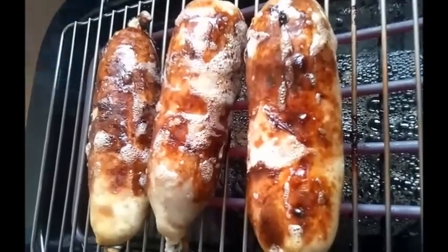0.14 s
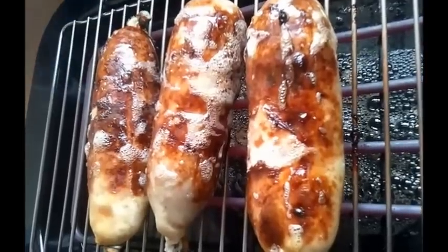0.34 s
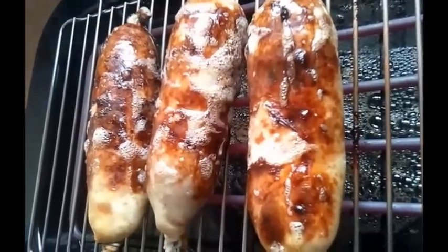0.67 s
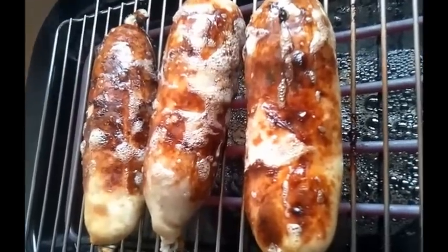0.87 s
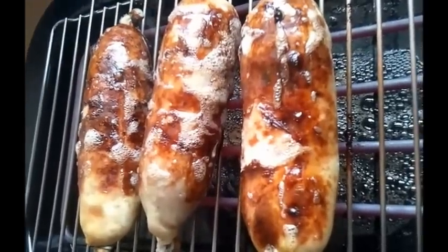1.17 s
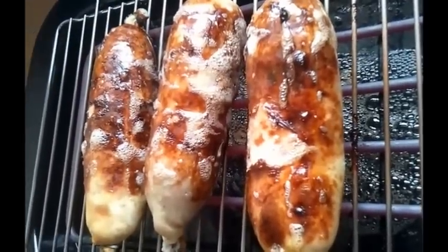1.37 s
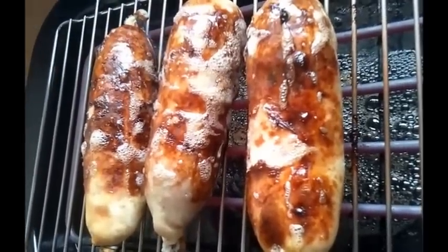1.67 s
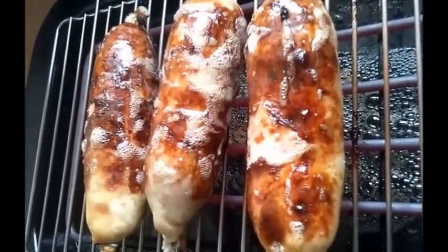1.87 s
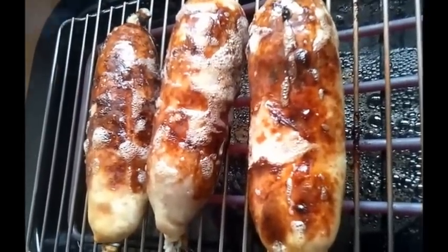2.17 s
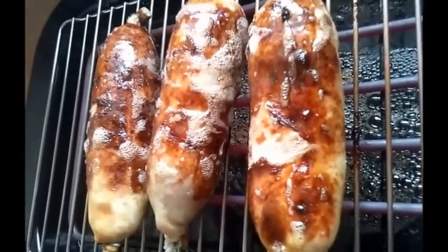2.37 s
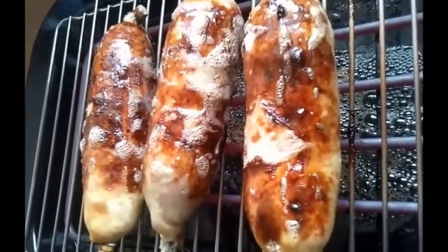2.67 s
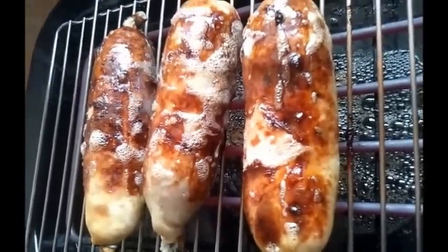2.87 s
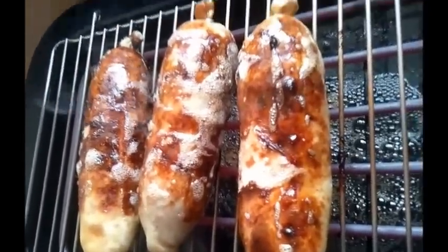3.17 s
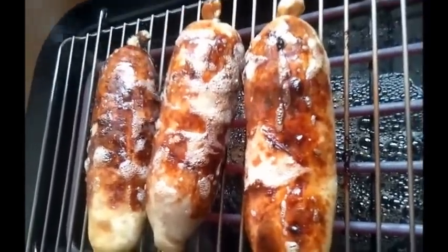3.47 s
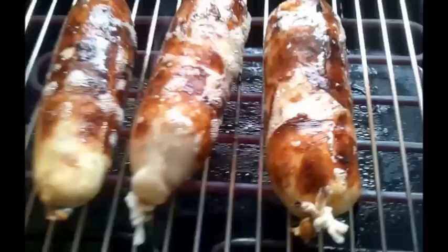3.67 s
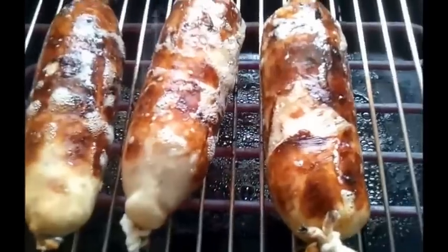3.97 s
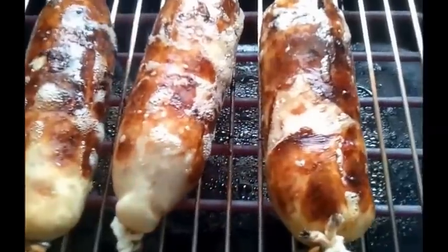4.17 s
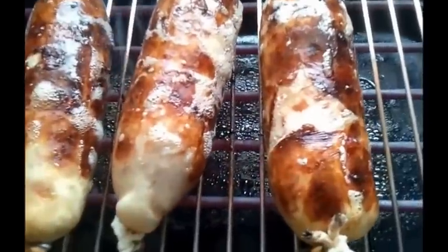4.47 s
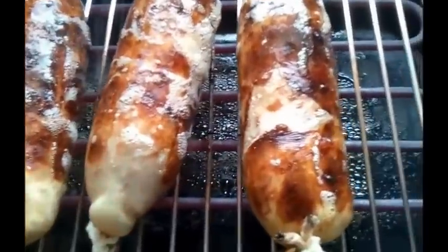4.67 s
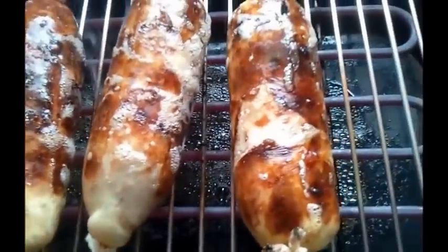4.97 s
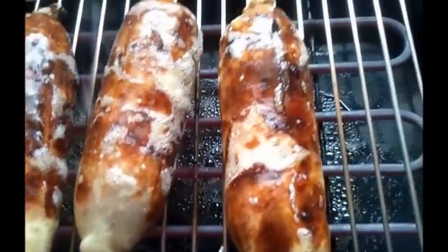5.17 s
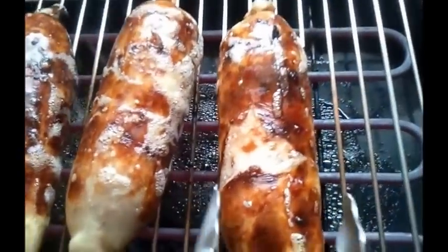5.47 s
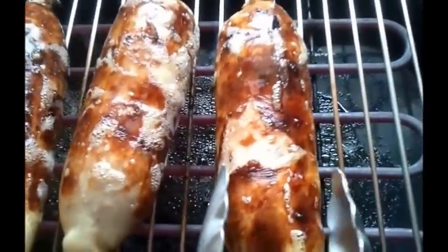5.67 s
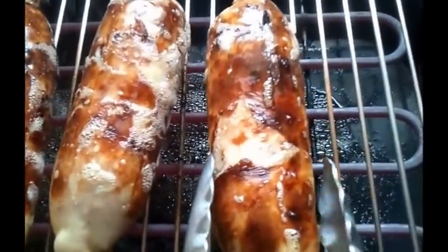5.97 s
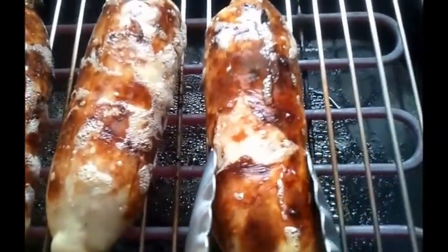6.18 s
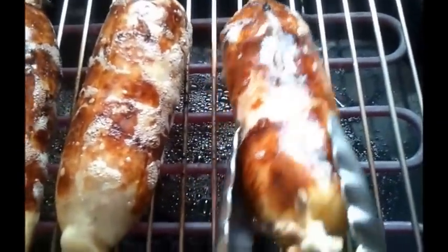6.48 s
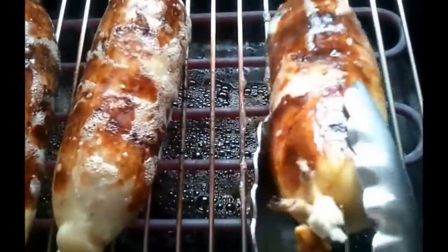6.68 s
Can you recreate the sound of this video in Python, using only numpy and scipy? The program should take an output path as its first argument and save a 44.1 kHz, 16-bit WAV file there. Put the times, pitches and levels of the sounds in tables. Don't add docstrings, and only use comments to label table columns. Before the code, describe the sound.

From 0 to about 3.2 seconds, sausages sizzle steadily close to a phone microphone: bright steamy hiss, fine clustered crackle and many irregular fat pops, some sharp, some with a duller body, each with a short splash and faint kitchen decay. The simmer swells slightly around 0.7 to 1.2, then eases. A weak low rumble lies beneath. At 3.25 to 3.3 two soft low touches thump, with a fainter one near 3.7, while the tone shifts as the phone turns, thinner in the middle. Sound drops to silence at 3.93 and restarts abruptly at 4.05 with a low lurch. A very loud crack hits at 4.11. The boil is now louder and crisper, with faint low drone swells near 4.45 and 4.8. Another hard crack comes at 5.46; after 6 seconds spitting pops crowd together and the hiss climbs strongly to the end, near 6.8.

```python
import sys
import numpy as np
from scipy import signal
from scipy.fft import rfft, irfft
from scipy.io import wavfile
from scipy.ndimage import uniform_filter1d, minimum_filter1d, map_coordinates

SR = 44100
rng = np.random.default_rng(int(sys.argv[2]) if len(sys.argv) > 2 else 0)


def wav_record(signal):
    frames = np.transpose(np.atleast_2d(signal))
    bounded = np.clip(frames, -1, 1)
    quanta = np.round(bounded * 32767).astype(np.int16)
    wavfile.write(sys.argv[1], SR, quanta)


def volts(x):
    e = np.asarray(x, float) / 20
    return 10 ** e


N = 301644

# frequency in Hz, density in dB per Hz.
RUMBLE = [(12, -25), (20, -2.5), (118, -2), (290, -5.5), (325, -10), (600, -10), (780, -10.5), (1320, -120)]
# frequency in Hz, width in Hz, level in dB.
ROOM_MODES = [
    (44, 4.4, 2),
    (275.5, 6.5, -4),
    (311, 17, -2),
]
# time in seconds, level in dB.
HOUSE_LEVEL = [
    [(0, -52), (3.9, -50.5)],
    [(4.9, -45), (5.3, -46)],
]
# peak time in seconds, level in dB.
SWELLS = [
    (4.45, -41),
    (4.79, -41),
    (5.11, -51),
    (5.89, -49.5),
    (6.23, -49),
    (6.56, -52),
]
# start in seconds, peak in dB, frequency in Hz.
BUMPS = [
    (3.249, -36, 59),
    (3.3, -41.5, 56.4),
    (3.726, -45, 57),
]
# time in seconds, share of the second position from 0 to 1.
TURN = [
    (3.25, 0),
    (3.6, .7),
    (4.05, 1),
]
# frequency in Hz, density in dB per Hz.
SIDE_ON = [(300, -25.5), (410, -19.5), (950, -11.5), (1670, -6.5), (2350, -18), (2900, -11), (3350, -7),
           (4250, -4), (5200, -9), (6100, 1), (8000, -3), (10200, 12), (11800, 2.5), (14400, 1)]
# frequency in Hz, density in dB per Hz.
HEAD_ON = [(320, -26), (1400, -15), (1950, -17), (2700, -25), (3250, -22), (3750, -15.5), (4250, -13.5),
           (5500, -14), (6500, -19.5), (8700, -9.5), (9800, 1), (11200, -0.5), (12300, -9), (14500, -17)]
# lower edge in Hz, upper edge in Hz.
BANDS = [(120, 2650), (2650, 7900), (7900, 17000)]
# start in seconds, peak in dB, thud in dB, body in dB.
EARLY_POPS = [(0.0787, -12, -24.5, -15.5), (0.163, -18, -25, -25), (0.2062, -25, -21, -8.5),
              (0.2448, -6.5, -28, -14), (0.3913, -19.5, -22, -17), (0.4254, -11, -28, -16),
              (0.4612, -17.5, -25, -16), (0.4978, -14.5, -25, -12.5), (0.5474, -15.5, -33, -20.5),
              (0.5837, -8.5, -30, -17.5), (0.6846, -11.5, -23, -21), (0.8492, -8.5, -30, -16.5),
              (0.8915, -17.5, -29, -10), (0.9118, -6, -28, -22), (1.0275, -24, -25.5, -13),
              (1.0867, -19, -16, -8), (1.1253, -11.5, -20, -8), (1.1447, -5.5, -12, -12.5),
              (1.1952, -6, -23, -17), (1.2451, -14.5, -20, -14), (1.2757, -11, -28, -17),
              (1.3282, -6.5, -26.5, -11.5), (1.4282, -7, -33, -21), (1.49, -5.5, -41, -22.5),
              (1.572, -10.5, -34, -17), (1.594, -9.5, -35, -23.5), (1.677, -24.5, -21, -12),
              (1.6923, -11.5, -41, -15.5), (1.8604, -24, -32, -17), (1.9114, -12.5, -25, -11)]
# start in seconds, peak in dB, thud in dB, body in dB.
MORE_POPS = [(1.9796, -9, -20, -10), (2.02, -14, -13, -11), (2.0448, -13, -24, -20), (2.111, -13, -34, -19),
             (2.2412, -15, -22, -13), (2.308, -25, -16, -7), (2.3354, -5.5, -24, -12),
             (2.4244, -15, -18, -8), (2.5657, -21, -30, -9), (2.6543, -14, -19, -11),
             (2.765, -14, -25, -15.5), (2.8893, -7.5, -25.5, -18.5), (2.9752, -19.5, -22, -14),
             (3.0113, -12, -28, -13.5), (3.0329, -13.5, -28, -11.5), (3.0865, -20, -39, -7),
             (3.216, -14.5, -15, -9), (3.2443, -9, -20.5, -16.5), (3.3023, -15.5, -21, -12.5),
             (3.3457, -17, -30, -11.5), (3.362, -13, -29.5, -21), (3.4, -15.5, -24, -17),
             (3.433, -15.5, -25.5, -18), (3.4559, -6.5, -35.5, -23.5), (3.5447, -11.5, -25.5, -15),
             (3.5767, -11.5, -28.5, -16.5), (3.6727, -17.5, -22, -18), (3.731, -12.5, -34, -16.5),
             (3.8124, -19.5, -33, -16.5), (3.845, -9.5, -35.5, -20.5)]
# start in seconds, peak in dB, thud in dB, body in dB.
LATE_POPS = [(4.1107, 6, -34, -20), (4.1786, -11, -17.5, -12), (4.6459, -9.5, -38, -26),
             (4.7164, -13, -23, -12), (4.8596, -11.5, -29.5, -19.5), (4.877, -11, -29, -19),
             (4.972, -11.5, -32, -23), (5.121, -5, -32, -25), (5.1768, -16.5, -24, -14),
             (5.3083, -8.5, -30, -30), (5.3428, -15, -23, -23), (5.3804, -8.5, -27, -21),
             (5.4303, -7.5, -29, -23), (5.4571, 3.5, -34, -19.5), (5.981, -10.5, -22, -18),
             (6.0853, -13.5, -29, -23.5), (6.1879, -13, -28, -21), (6.2256, -5, -27, -24),
             (6.2953, -4, -22.5, -33), (6.3153, -5.5, -23.5, -19), (6.3325, -6.5, -25.5, -22.5),
             (6.3901, -4, -33, -25), (6.4794, -7.5, -26, -18), (6.5081, -9.5, -40, -25),
             (6.5337, -10.5, -33, -18), (6.5626, -12, -30, -20.5), (6.5784, -6, -34, -14.5),
             (6.6451, -10.5, -26, -26), (6.7118, -9.5, -34, -24.5), (6.7613, -3.5, -32, -20)]
# start in seconds, peak in dB.
TICKS = [(0.2574, -9), (0.2994, -15), (0.9584, -14), (1.0934, -13), (1.1154, -7), (1.2004, -14),
         (1.2884, -16), (1.4464, -17), (1.5114, -20), (2.4344, -14), (2.4474, -17), (2.6674, -14),
         (2.7334, -13), (2.8504, -20), (2.9104, -13), (3.2514, -15), (3.4374, -12), (3.5534, -11),
         (4.4518, -12), (4.4814, -14), (5.3198, -8), (5.3884, -9), (5.5069, -9), (5.9359, -12),
         (6.2003, -8), (6.3004, -3), (6.3554, -10), (6.4358, -9), (6.4527, -10), (6.7795, -10)]
# before the pause in dB, after it in dB.
SNAPS_DB = (-13.5, -8.5)
# time in seconds, level in dB.
HEAT = [
    [(0, -37.5), (.25, -37.5), (.7, -34), (1.25, -35), (1.55, -38), (2.4, -36.5), (2.85, -36), (3.4, -38),
     (3.8, -36.5)],
    [(4.13, -30.5), (4.3, -30), (4.85, -32), (5.3, -32.5), (5.5, -29), (6.25, -29.5), (6.33, -30),
     (6.7, -26.5), (6.84, -22.5)],
]
# simmer in dB, hiss in dB, fizz in dB.
BAND_LEVELS_DB = [(-11, -5.5, -3.5), (-12, -10, -3.5)]
# stop in seconds, restart in seconds.
PAUSE = (3.929, 4.053)
# frequency in Hz, level in dB under the general level.
FAINTEST = [(250, -30), (350, -8), (3500, -6.5), (4000, -11.5)]


def unit(x):
    return x / np.sqrt(np.mean(x ** 2) + 1e-20)


def curves(rows):
    s, *columns = np.transpose(rows)
    return [np.interp(np.arange(N) / SR, s, column) for column in columns]


def joined(parts):
    return np.where(np.arange(N) / SR < PAUSE[1], curves(parts[0]), curves(parts[1]))


def wobble(rate):
    knots = rng.standard_normal(int(N * rate / SR) + 4)
    return map_coordinates(knots, [np.arange(N) * rate / SR])


def causal(spectrum, size=4096):
    f, db = np.transpose(spectrum)
    log_hz = np.log(np.fft.rfftfreq(size, 1 / SR) + 1)
    gain = volts(np.interp(log_hz, np.log(f), db))
    cepstrum = irfft(np.log(gain + 1e-6))
    cepstrum[1:size // 2] *= 2
    cepstrum[size // 2 + 1:] = 0
    return irfft(np.exp(rfft(cepstrum)))


def patchy(depth_db):
    z = signal.stft(rng.standard_normal(N + 256), nperseg=256)[2]
    field = uniform_filter1d(rng.standard_normal(z.shape), size=5, axis=0)
    field = uniform_filter1d(field, size=8, axis=1)
    noise = signal.istft(z * volts(depth_db * unit(field)), nperseg=256)[1]
    return unit(noise[:N])


def kitchen():
    hz = np.fft.rfftfreq(N, 1 / SR)
    modes = sum(volts(db) * 1j * hz * w / (c * c - hz * hz + 1j * hz * w) for c, w, db in ROOM_MODES)
    boom = unit(irfft(rfft(rng.standard_normal(N)) * modes, N))
    boom = boom * volts(-3.5 + 1.8 * wobble(2.34))
    broad = unit(signal.fftconvolve(patchy(depth_db=2.5), causal(RUMBLE, size=16384))[:N])
    return volts(joined(HOUSE_LEVEL)[0]) * (broad + curves(TURN)[0] * boom)


def drone():
    rest_db, swell_s, mode_hz = -56.5, 0.085, 91
    t = np.arange(N) / SR
    level = volts(rest_db) + sum(volts(db) * np.exp(-((t - s) / swell_s) ** 2) for s, db in SWELLS)
    tone = unit(np.sin(2 * np.pi * mode_hz * t + 1.8 * wobble(11)))
    return level * tone * (t > PAUSE[1])


def bumps():
    out, t = np.zeros(N + SR), np.arange(SR // 10) / SR
    dull = signal.butter(2, (100, 400), "bandpass", fs=SR, output="sos")
    for s, db, hz in BUMPS:
        scuff = unit(signal.sosfilt(dull, rng.standard_normal(len(t))))
        scuff = volts(-10 - 60 * t / .1) * scuff
        thump = volts(-60 * t / 0.11) * np.sin(2 * np.pi * hz * t)
        out[round(s * SR):][:len(t)] += volts(db + 11.0) * (thump + scuff)
    return out[:N]


def bursts(count, tail_db):
    snap_share = 0.36
    t = np.arange(SR // 8) / SR
    late = t - .0021 * volts(rng.normal(0, 1.5, (count, 1)))
    echo = volts(-15.5 - 60 * np.abs(late) / 0.0032) * (late > 0)
    spit = volts(-60 * t / 0.002) + echo
    tail = volts(tail_db + 4 - 60 * t / .03) + volts(tail_db - 60 * t / .2)
    rows = (spit + tail) * rng.standard_normal((count, len(t)))
    rows = rows / np.linalg.norm(rows[:, :SR // 500], axis=1, keepdims=True)
    return rows + snap_share * (t == 0) * np.sign(rows[:, :1])


def pops():
    thud_db, body_db = -27.5, -18
    trains = np.zeros((len(BANDS), N + SR))
    ticks = [(s, db, thud_db, body_db) for s, db in TICKS]
    ring_bands = ((1000, 2000), (4000, 7000), (9300, 11300))  # Hz, where each part's peak is set
    rings = [signal.butter(1, band, "bandpass", fs=SR, output="sos") for band in ring_bands]
    for events in (EARLY_POPS, MORE_POPS, LATE_POPS, ticks):
        for (s, db, *parts_db), burst in zip(events, bursts(count=len(events), tail_db=-22.5)):
            at = round((s + .0007) * SR)
            peaks = np.array([np.abs(signal.sosfilt(ring, burst[:SR // 100])).max() for ring in rings])
            snap_db = SNAPS_DB[int(s > PAUSE[1])]
            gains = volts(db + np.array([*parts_db, snap_db])) / peaks
            trains[:, at:at + len(burst)] += gains[:, None] * burst
    dull = signal.butter(2, 11500, fs=SR, output="sos")
    return volts(np.array([[-1.5], [6], [3]])) * signal.sosfilt(dull, trains[:, :N])


def crackle(rate, spread_db):
    when, size = rng.random((2, N))
    chance = rate * volts(3 * wobble(25)) / SR
    clicks = (when < chance) * volts(-spread_db * np.log(np.maximum(size, .04)))
    kinds = bursts(count=6, tail_db=-27.5)
    kind = rng.integers(len(kinds), size=N)
    return unit(sum(signal.fftconvolve(clicks * (kind == k), b)[:N] for k, b in enumerate(kinds)))


def sizzle():
    reversal = 0.93
    finer_db = -0.5
    turn = curves(TURN)[0]
    first, second = np.array(BAND_LEVELS_DB)[:, :, None]
    levels_db = joined(HEAT)[0] + first + (second - first) * turn
    grains = crackle(rate=450, spread_db=5)
    flutter = .6 * wobble(9) + 1.6 * wobble(35)
    flutter_db = flutter * (0.5 - reversal * turn)
    layers = []
    for level_db, grain_db in zip(levels_db, (-5, -.4, -.4)):
        steam = patchy(depth_db=2.0)
        layers.append(volts(level_db + flutter_db) * (steam + volts(grain_db + finer_db * turn) * grains))
    return np.array(layers)


def heard(x, band):
    sos = signal.butter(3, band, "bandpass", fs=SR, output="sos")
    paths = [signal.sosfilt(sos, causal(view)) for view in (SIDE_ON, HEAD_ON)]
    first, second = [signal.fftconvolve(x, p / np.linalg.norm(p))[:N] for p in paths]
    share = np.clip(curves(TURN)[0], 0, 1)
    return np.sqrt(1 - share) * first + np.sqrt(share) * second


def scene():
    grill = sum(heard(x, band) for x, band in zip(sizzle() + pops(), BANDS))
    return (grill + kitchen() + drone() + bumps())[None]


def unmasked(x):
    hz, _, z = signal.stft(x, SR, window="cosine", nperseg=2048, noverlap=1024)
    power = np.abs(z) ** 2
    steady = minimum_filter1d(power.mean(axis=0), size=3)
    floor_db = np.interp(hz, *np.transpose(FAINTEST))
    keep = uniform_filter1d(power, size=3, axis=0) > steady * volts(2 * floor_db)[:, None]
    return signal.istft(z * keep, window="cosine", nperseg=2048, noverlap=1024)[1][:N]


def low_pass(x):
    return signal.sosfilt(signal.butter(12, 15870, fs=SR, output="sos"), x)


def record(dry):
    t = np.arange(N) / SR
    stop, start = PAUSE
    since = np.maximum(t - start, 0)
    tail = volts(-15 - 900 * (t - stop) - 5e4 * (t - stop) ** 2)
    gate = np.where(t < stop, 1, tail) + np.clip(since / .004, 0, 1)
    swing = np.exp(-since / 0.1) - 2.37 * np.exp(-since / 0.045) + 1.5 * np.exp(-since / 0.011)
    swing = 0.22 * swing * (t > start)
    band = np.where(np.fft.rfftfreq(N, 1 / SR) < 14600, 1, volts(-30))
    limited = irfft(rfft(np.clip(dry[0], -1, 1)) * band, N)
    x = unmasked(limited) * gate + swing
    return low_pass(np.clip(x, -1, 1)[None])


dry = scene()
out = record(dry)
wav_record(out)
```